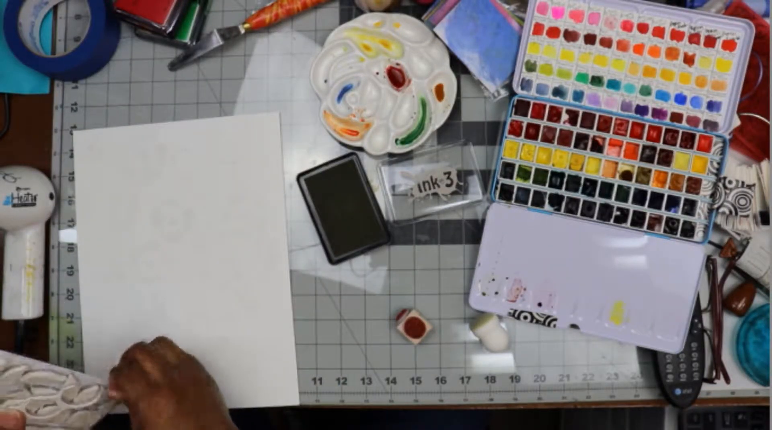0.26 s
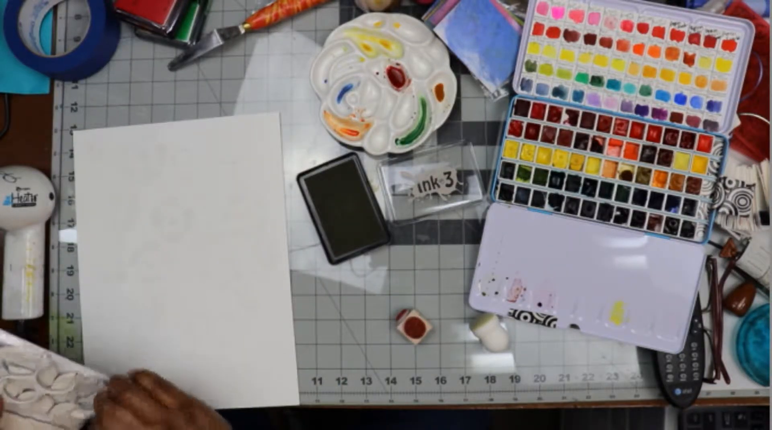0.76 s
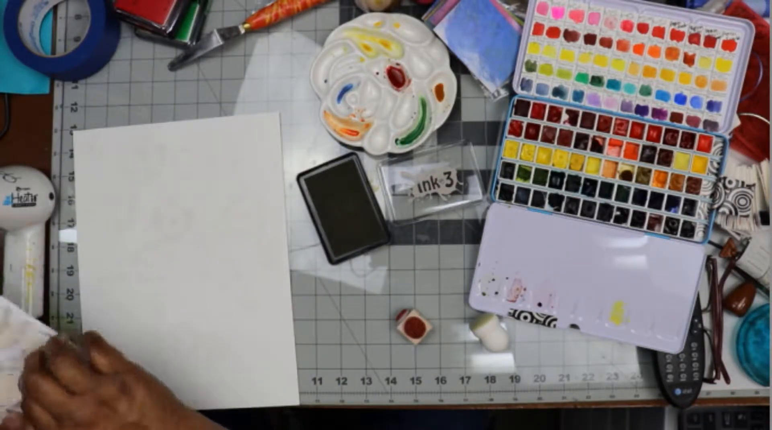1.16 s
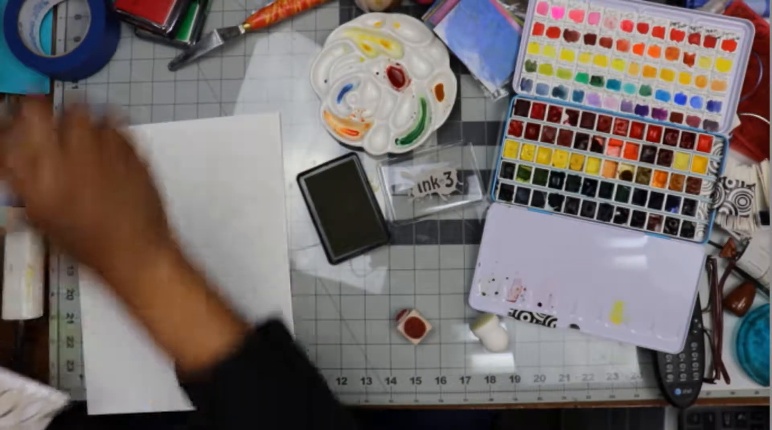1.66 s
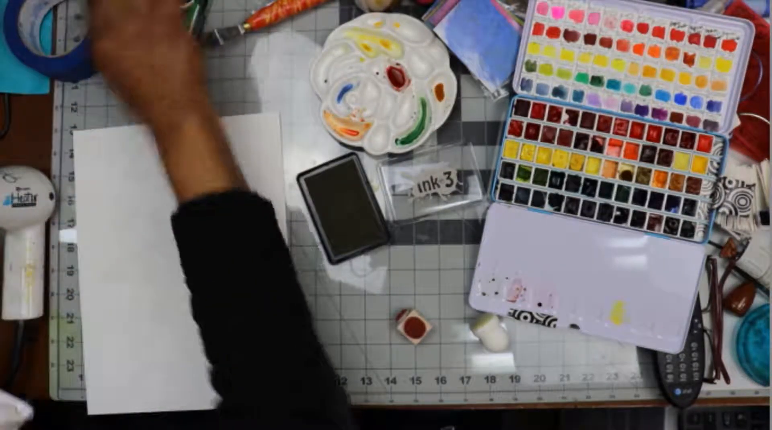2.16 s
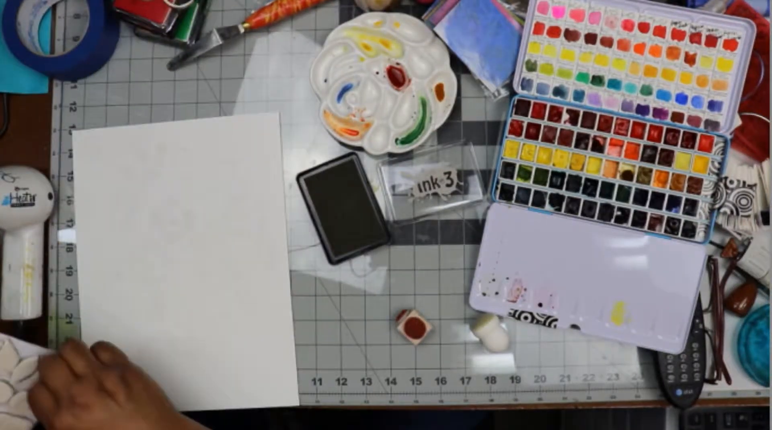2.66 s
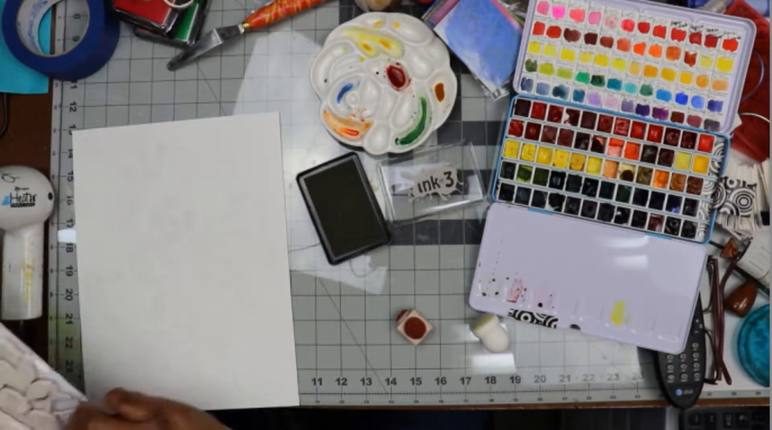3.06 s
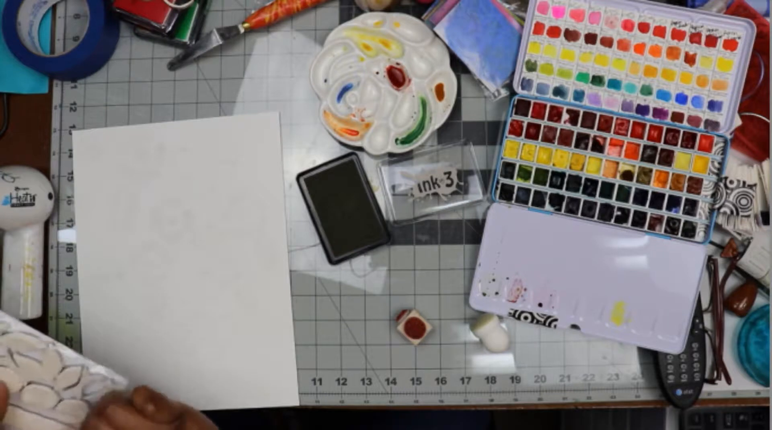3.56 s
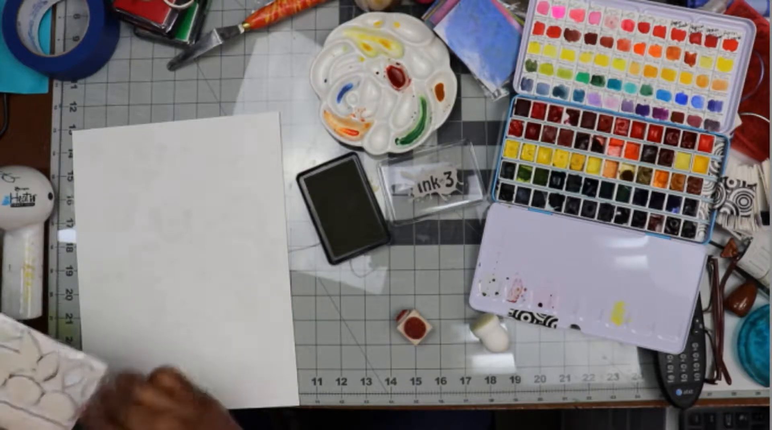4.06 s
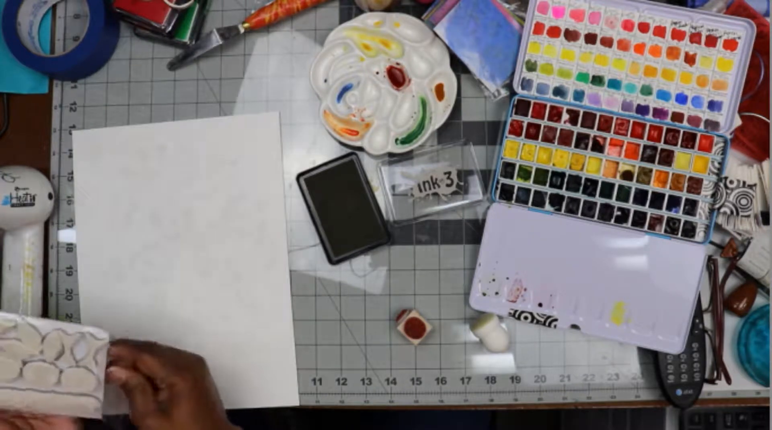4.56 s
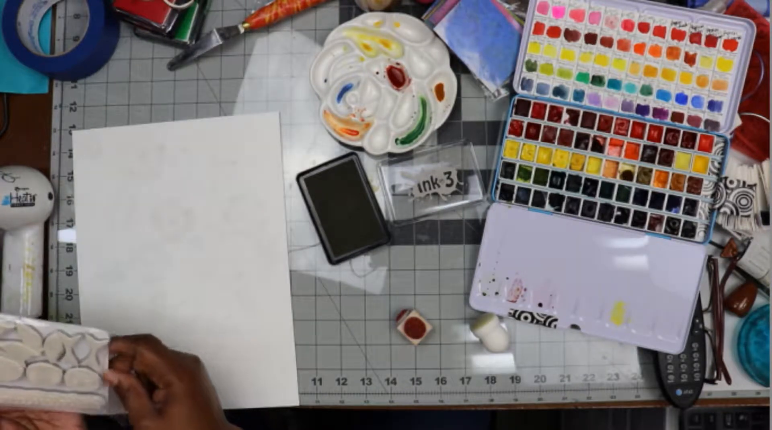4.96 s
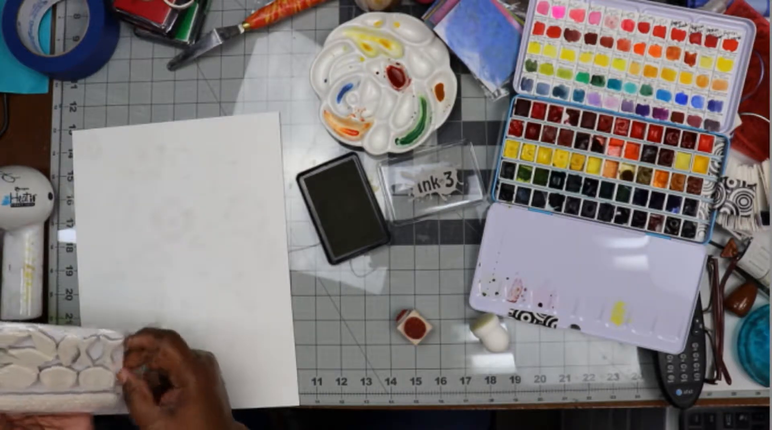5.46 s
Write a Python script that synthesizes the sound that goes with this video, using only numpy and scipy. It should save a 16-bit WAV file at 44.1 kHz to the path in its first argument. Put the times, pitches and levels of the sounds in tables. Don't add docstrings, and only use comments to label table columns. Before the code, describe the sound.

Stiff plastic film crackles in sharp, bright clusters as fingers flex it at a desk, over a faint low fan hum.

```python
import sys
import numpy as np
from scipy import signal
from scipy.fft import rfft, irfft
from scipy.io import wavfile
from scipy.ndimage import uniform_filter1d

SR = 44100
rng = np.random.default_rng(int(sys.argv[2]) if len(sys.argv) > 2 else 0)


def invert_db(x):
    u = np.asarray(x, float) / 20
    return 10 ** u


def dump_mix(stems):
    frames = np.atleast_2d(stems).T
    limited = np.clip(frames, -1, 1)
    pcm = np.round(limited * 32767).astype(np.int16)
    wavfile.write(sys.argv[1], SR, pcm)


N = 251622

# start_s, level_db, pitch_hz
SNAPS = [(.3033, -9, 4030), (.3076, -18, 6030), (.3564, -19, 6400), (.358, -17, 6440), (.3819, -22, 4650),
         (.3859, -12, 6500), (.3935, -19, 6850), (.3973, -16, 5880), (.4234, -22, 6270), (.439, -27, 5400),
         (.4541, -11, 6570), (.4591, -19, 6160), (1.194, -22, 5730), (1.1968, -23, 6200),
         (2.7817, -11, 5320), (2.7837, -14, 6930), (2.7887, -10, 5510), (2.8004, -15, 5080),
         (2.8043, -10, 5560), (2.8085, -9, 5210), (2.8172, -17, 5020), (2.8252, -18, 6500),
         (3.0185, -23, 5770), (3.0308, -20, 5750), (3.5307, -21, 3250), (3.5362, -17, 5640),
         (3.5424, -16, 5230), (3.6167, -11, 5560), (3.6213, -20, 5360), (3.6465, -18, 6290)]
# start_s, crinkle_db, crinkle_t60_s, flex_db
BURSTS = [(0.305, -23.5, .07, -63), (.357, -26.5, 0.0612, -44), (0.3822, -28.5, .17, -46),
          (.4398, -43, 0.088, -45), (0.454, -28, .07, -45), (1.1947, -28, .15, -57),
          (1.203, -31, .016, -65), (2.781, -21, .14, -29), (2.805, -20, .11, -33), (2.826, -33, .05, -42),
          (3.016, -31, .12, -41), (3.0311, -31, .09, -50), (3.046, -43, .04, -57), (3.5265, -30, .2, -42),
          (3.543, -27, 0.055, -33), (3.5725, -47, .07, -55), (3.61, -33, 0.063, -53),
          (3.6172, -28, .2, -35), (3.647, -33, .13, -36), (3.664, -40, .055, -44), (5.56, -44, .09, -70)]
# time_s, level_db
SLIDING = [(0, -68.5), (.13, -71.5), (.3, -65.5), (.55, -75), (.95, -69.5), (1.06, -66), (1.27, -71),
           (2.14, -78), (2.43, -74.5), (2.71, -70), (3.33, -70.5), (3.52, -74), (3.63, -91), (3.92, -67),
           (3.98, -77), (4.35, -71.5), (5.22, -75.5), (5.5, -71.5)]
# freq_hz, level_db
FILM = [(900, -43), (1800, -15), (2400, -5.5), (3300, -2), (3700, -4), (4900, -0.5), (5500, -1),
        (7100, -4.5), (8000, -13), (8800, -20), (11000, -28)]


def evened(x):
    return x / np.sqrt(np.mean(x ** 2) + 1e-20)


def read(points, hz):
    f, value = np.transpose(points)
    return np.interp(np.log(hz + 1), np.log(f + 1), value)


def curve(rows):
    return np.interp(np.arange(N) / SR, *np.transpose(rows))


def add(mix, s, sound):
    part = mix[round(s * SR):][:len(sound)]
    part += sound[:len(part)]


def resonate(x, hz, width):
    turn = np.exp(2j * np.pi * np.cumsum(hz * np.ones(len(x))) / SR)
    r = np.exp(-np.pi * width / SR)
    return 2 * (turn * signal.lfilter([1 - r], [1, -r], x / turn)).real


def causal(points):
    log_gain = np.log(invert_db(read(points, abs(np.fft.fftfreq(4096, 1 / SR)))))
    return np.fft.ifft(np.exp(np.conj(signal.hilbert(log_gain)))).real[:1024]


def slips(per_s, spread_db):
    size = invert_db(spread_db * np.minimum(rng.exponential(1, N), 4))
    return evened(size * rng.standard_normal(N) * (rng.random(N) < per_s / SR))


def dying(rows, swells=()):
    level_db = np.full(N, -120.)
    t = np.arange(SR // 4) / SR
    for s, db, t60 in rows:
        part = level_db[round(s * SR):][:len(t)]
        part[:] = (db - 60 * t / t60)[:len(part)]
    for s, db, rise in swells:
        part = level_db[round(s * SR) - len(t):round(s * SR)]
        part[:] = np.maximum(part, db - 60 * t[::-1] / rise)
    return uniform_filter1d(invert_db(level_db), size=30)


def gain_db(t, step_s=.033, recover_s=.24, open_db=1):
    # start_s, step_db
    ducks = [
        (2.78, -3.5),
        (3.611, -15),
    ]
    total = open_db
    for s, db in ducks:
        fall = np.clip((t - s) / step_s, 0, 1)
        total = total + db * fall * np.exp(-np.maximum(t - s - step_s, 0) / recover_s)
    return total


def room(air_db=-55.45, patchy_db=.9, waver_hz=7):
    # freq_hz, level_db (per Hz)
    air_spectrum = [(40, -36), (104, -38), (118, -14), (161, 5), (186, -5), (204, -8), (266, -10),
                    (565, -21.5), (853, -18.5), (1150, -23.5), (2650, -22), (3300, -32), (6900, -38),
                    (9000, -41.5)]
    # freq_hz, level_db
    motor_tones = [(120, -76.5), (177, -65.5), (254, -72.5), (276, -72), (355, -74.5)]
    a, b, patches = rng.standard_normal((N // 256 + 5, 513, 3)).T
    patches = uniform_filter1d(patches, size=9, axis=0)
    patches = evened(uniform_filter1d(patches, size=12, axis=1))
    white = signal.istft((a + 1j * b) * invert_db(patchy_db * patches), nperseg=1024, noverlap=768)[1][:N]
    air = irfft(rfft(white) * invert_db(read(air_spectrum, np.fft.rfftfreq(N, 1 / SR))), N)
    sound = invert_db(air_db) * evened(air)
    for hz, db in motor_tones:
        tone = resonate(rng.standard_normal(N), hz, waver_hz)
        sound += invert_db(db) * evened(resonate(tone, hz, 3 * waver_hz))
    return sound


def knocks(thump_hz=59.9, thump_t60=.11):
    # start_s, level_db, pitch_hz, t60_s
    desk_knocks = [(0.305, -33, 502, 0.026), (.305, -34, 330, 0.045), (.352, -36, 1900, 0.04),
                   (.358, -36.5, 1130, 0.025), (.402, -42, 1087, 0.052), (.437, -47, 3000, .04),
                   (.454, -20, 2870, 0.019), (.454, -36.5, 1416, 0.047), (1.193, -36.5, 2020, 0.022),
                   (1.917, -48, 1500, 0.026), (2.782, -18.5, 1120, 0.025), (2.782, -24, 880, 0.028),
                   (2.807, -21.5, 1364, .03), (2.817, -29, 2370, 0.013), (2.833, -42, 1103, 0.038),
                   (2.786, -31, 2900, .04), (3.017, -34.5, 1190, 0.03), (3.017, -34, 2150, .04),
                   (3.645, -36, 1200, .05), (.439, -44, 1400, .03), (3.529, -27.5, 3300, 0.033),
                   (3.541, -28, 1763, 0.035), (3.616, -19, 2115, 0.02), (3.617, -34, 500, 0.015),
                   (3.626, -32.5, 1640, 0.053)]
    # start_s, level_db
    thumps = [
        (.035, -62),
        (.3, -64),
        (.453, -54),
        (1.195, -54),
        (3.02, -55),
        (3.54, -64.5),
    ]
    out, t = np.zeros(N), np.arange(8000) / SR
    for s, db, hz, t60 in list(desk_knocks) + [(s, db, thump_hz, thump_t60) for s, db in thumps]:
        soft_start = 1 - np.exp(-t * hz)
        add(out, s, invert_db(db - 60 * t / t60) * np.sin(2 * np.pi * hz * t) * soft_start)
    return out


def rustle():
    return invert_db(curve(SLIDING)) * evened(signal.oaconvolve(slips(6100, 4.9), causal(FILM))[:N])


def flex(all_db=-3, linger=1.25):
    # freq_hz, width_hz, level_db
    bending = [(970, 86, -7.5), (1265, 420, 4.5), (1500, 1200, -6.5), (1900, 75, 8)]
    shake = slips(6000, 1.5)
    modes = sum(invert_db(db) * resonate(resonate(shake, hz, 2 * w), hz, w) for hz, w, db in bending)
    level = dying([(s, db, linger * t60) for s, _, t60, db in BURSTS])
    return invert_db(all_db) * level * evened(modes)


def crinkle(faint, ring_db=-3.5, ring_width_hz=900, all_db=-.4):
    # release_s, level_db, rise_s (for 60 dB)
    strains = [
        (.301, -47, .08),
        (.356, -30, .018),
        (.453, -38, .012),
        (1.1935, -32, .006),
        (2.777, -44, .1),
        (2.78, -30, .015),
        (3.016, -34, .005),
        (3.527, -31, .012),
        (3.609, -38, .07),
    ]
    levels = [dying([row[:3] for row in BURSTS], strains)]
    for rows, trail_db, trail_t60 in (SNAPS, -12, .04), (faint, -10, .1):
        levels.append(dying(sorted((s + .0008, db + trail_db, trail_t60) for s, db, _ in rows)))
    level = np.max(levels, axis=0)
    s, _, hz = np.transpose(sorted(map(tuple, list(SNAPS) + faint)))
    latest = np.searchsorted(s, np.arange(N) / SR + .002) - 1
    crease_hz = hz[np.clip(latest, 0, None)]
    grit = evened(signal.oaconvolve(slips(10000, 2), causal(FILM))[:N])
    grit = grit + invert_db(ring_db) * evened(resonate(grit, crease_hz, ring_width_hz))
    steady = grit / np.sqrt(uniform_filter1d(grit ** 2, size=90))
    return invert_db(all_db) * level * steady


def chance_snaps(count=3, after_db=4.5, after_span=.38, stray_db=20, low_hz=3500, high_hz=6900):
    stray_s = np.array([.1269, .2617, .5333, .6741, .9054, .9418, .9931, 1.0873, 1.1458, 1.28, 2.3616,
                        2.8823, 3.0698, 3.3502, 3.4243, 3.935, 4.2614, 4.3265, 4.8121, 4.8588, 4.9315,
                        4.9658, 5.1516, 5.3998, 5.6608])
    late, pitch = rng.random((len(BURSTS), count, 2)).T
    s, db, t60, _ = np.transpose(BURSTS)
    span = np.minimum(after_span, np.diff(s, append=N / SR) / t60)
    share = span * (np.arange(count)[:, None] + .2 + .8 * late) / count
    after = s + share * t60, db - 60 * share + after_db, np.interp(pitch, (0, 1), (low_hz, high_hz))
    level_db = np.interp(stray_s, *np.transpose(SLIDING)) + stray_db
    stray = stray_s, level_db, np.interp(rng.random(len(stray_s)), (0, 1), (low_hz, high_hz))
    return np.reshape(after, (3, -1)).T.tolist(), np.transpose(stray).tolist()


def snaps(loud, faint, spread_turns=1.4, edge_db=-5, loud_db=1.2, faint_db=4):
    out = np.zeros(N)
    edge = np.roll(causal(FILM)[:200], 30)
    edge = invert_db(edge_db) * edge / abs(edge).max()
    t = (np.arange(200) - 40) / SR
    for rows, extra_db in (loud, loud_db), (faint, faint_db):
        for s, db, hz in rows:
            width = spread_turns / hz * np.where(t < 0, 1, 1.5)
            snap = np.exp(-(t / width) ** 2) * np.sin(2 * np.pi * hz * t) - edge
            snap /= abs(signal.hilbert(snap)).max()
            add(out, s - 44 / SR, invert_db(db + extra_db) * snap)
    return out


def scene():
    # start_s, level_db, pitch_hz
    ticks = [(.0369, -44, 3490), (.172, -48, 5270), (.6236, -42, 6730), (.7131, -44, 6430),
             (.885, -50.5, 2588), (1.0363, -46.5, 5580), (1.9177, -45, 3210), (1.2602, -50, 4410),
             (2.3821, -44, 5940), (2.4054, -44, 2430), (2.5282, -49.5, 4530), (2.6197, -46, 6680),
             (2.6538, -43, 6860), (2.7307, -49, 5150), (2.8547, -41, 3040), (3.907, -51, 6350),
             (3.12, -48, 2990), (3.4741, -46, 5740), (3.5065, -47, 4330), (3.7976, -52, 5054),
             (3.8487, -53.5, 5380), (3.9843, -48, 5320), (4.0847, -47, 3850), (4.1223, -45, 5770),
             (4.3809, -44, 5240), (4.4093, -44, 3584), (5.4204, -46.5, 4860), (5.5592, -40, 4820),
             (5.6045, -44, 5770), (5.6726, -48, 4780)]
    after, stray = chance_snaps()
    loud, faint = list(SNAPS) + after, list(ticks) + stray
    background = invert_db(gain_db(np.arange(N) / SR)) * room()
    sheet = rustle() + flex() + crinkle(faint) + snaps(loud, faint)
    mid = background + knocks() + sheet
    return np.array([mid, mid])


def camera_processing(x, keep_db=-8, top_db=-4, starve_db=9.5, loud_db=-57, grit_db=-21):
    # start_s, length_s
    starved = [(.75, .027), (1.03, .045), (1.14, .025), (1.29, .02), (2.88, .04), (3.12, .025), (3.46, .02),
               (3.9, .05), (3.97, .025), (4.39, .045), (4.85, .022), (5.1, .02), (5.59, .027)]
    hz, t, z = signal.stft(x, SR, "cosine", nperseg=1024)
    top = (hz > 6900)[:, None]
    block = np.arange(len(t)) // 2 * 2
    band = np.round(9 * np.log(1 + hz / 700)).astype(int)
    member = band == np.arange(band.max() + 1)[:, None]
    power = uniform_filter1d(abs(z) ** 2, size=2, axis=1, origin=-1)[:, block] + 1e-20
    wide_db = 10 * np.log10(member @ power / member.sum(1)[:, None])[band]
    fine_db = 10 * np.log10(abs(uniform_filter1d(power, size=9, axis=0)) + 1e-20)
    usual_db = np.median(wide_db, axis=1)[:, None] + gain_db(t)
    short_db = np.zeros(z.shape)
    for s, length in starved:
        goes_short = uniform_filter1d(rng.standard_normal(len(hz)), size=4)[band] > 0
        short_db += starve_db * np.outer(goes_short, (t > s) & (t < s + length))
    band_bar_db = usual_db + keep_db + short_db + 2.6 * rng.standard_normal(z.shape)[band][:, block]
    top_bar_db = usual_db[top.argmax() - 9] + top_db + 3.8 * rng.standard_normal(len(t))[block]
    kept = np.where(top, fine_db > top_bar_db, wide_db > band_bar_db)
    z = z * (kept | (hz < 400)[:, None])
    loud = wide_db[hz > 1000].max(0) > loud_db
    tilt = (1 + 3 * (hz > 7500) + 4 * (hz < 90))[:, None]
    apart = invert_db(grit_db) * loud * tilt * np.sqrt(power) * np.exp(2j * np.pi * rng.random(z.shape))
    mid, side = signal.istft([z, apart], SR, "cosine", nperseg=1024)[1][:, :N]
    return np.array([mid + side, mid - side])


def top_cut(x):
    return signal.sosfilt(signal.butter(12, 9530, fs=SR, output="sos"), x)


def record(dry):
    # freq_hz, level_db
    mic_response = [(100, 0), (6900, 0), (7600, -2.5), (8300, -5), (9150, -9), (9450, -50), (12000, -80)]
    heard = signal.oaconvolve(dry[0], causal(mic_response))[:N]
    heard = signal.sosfilt(signal.butter(2, 45, "high", fs=SR, output="sos"), heard)
    return top_cut(camera_processing(heard))


dry = scene()
out = record(dry)
dump_mix(out)
```